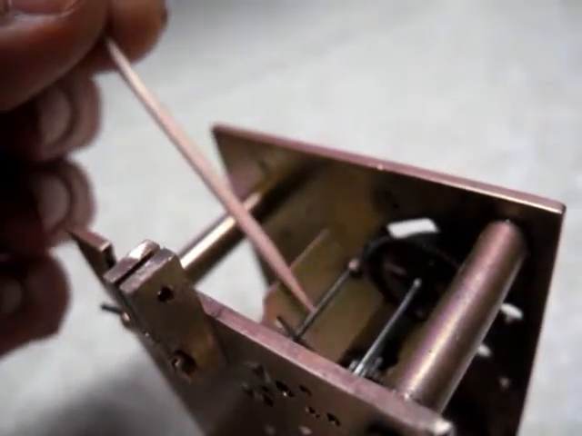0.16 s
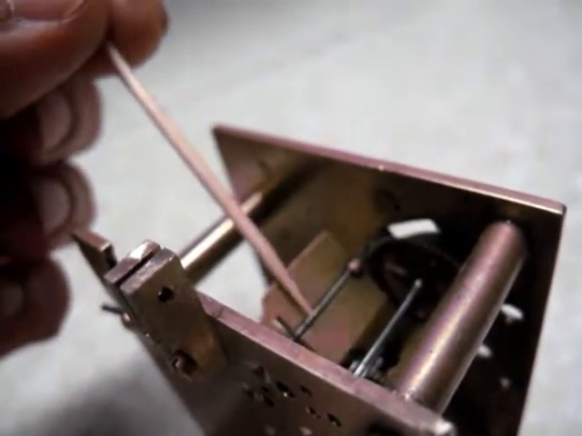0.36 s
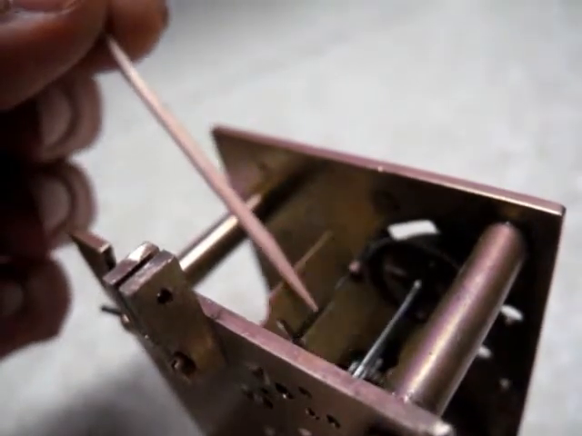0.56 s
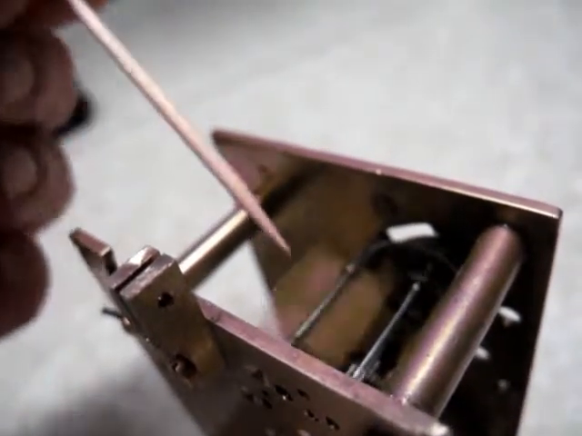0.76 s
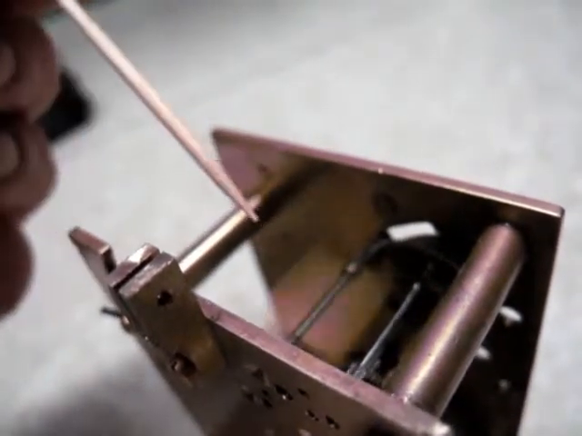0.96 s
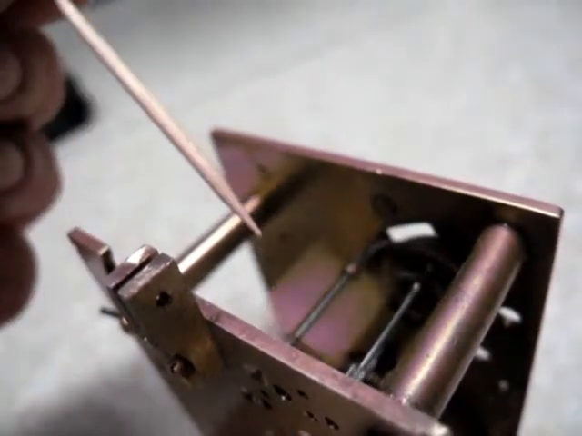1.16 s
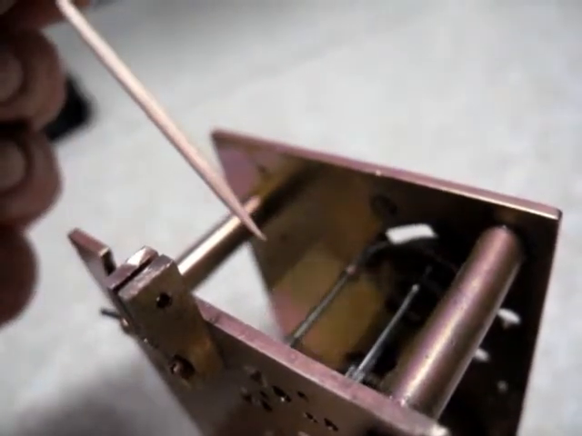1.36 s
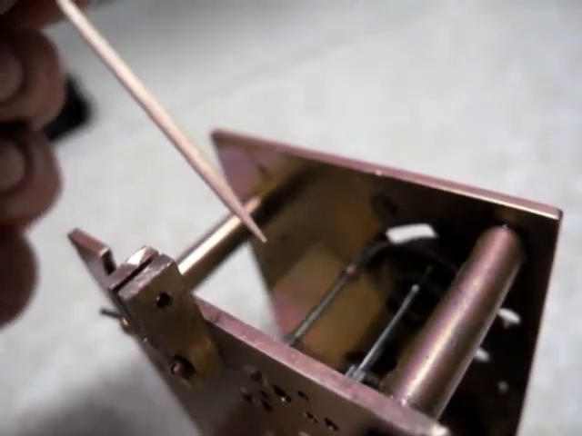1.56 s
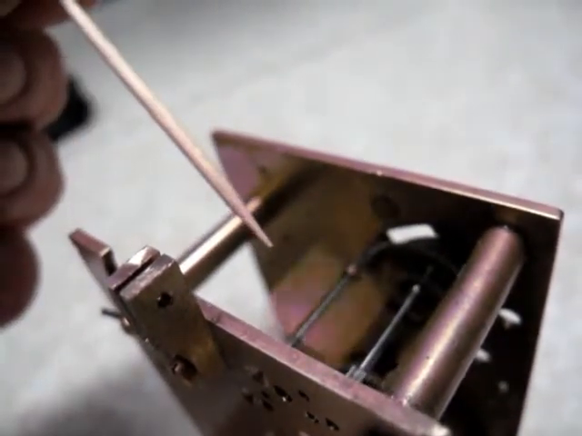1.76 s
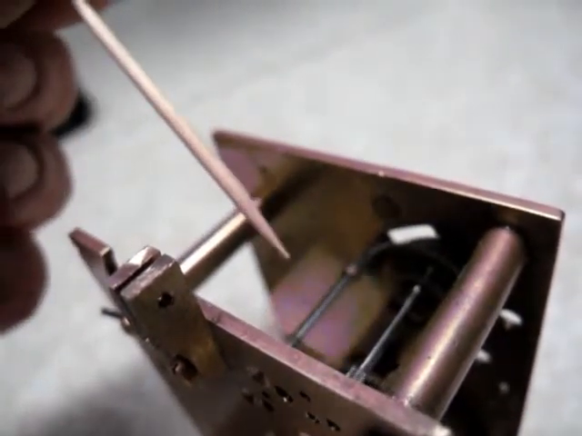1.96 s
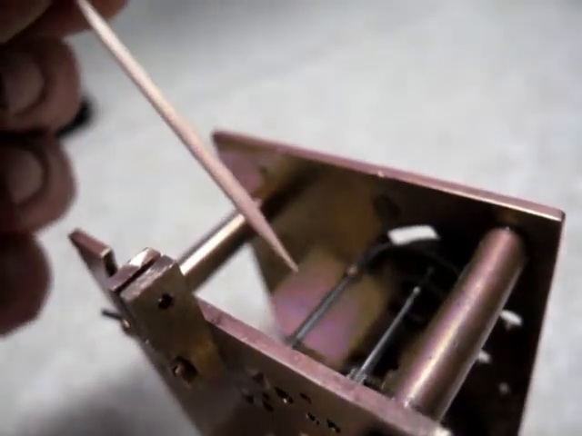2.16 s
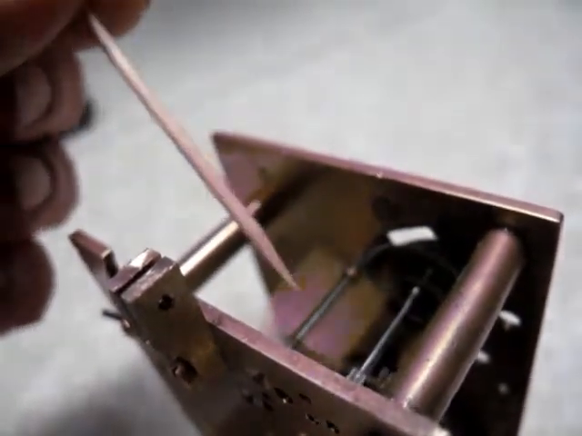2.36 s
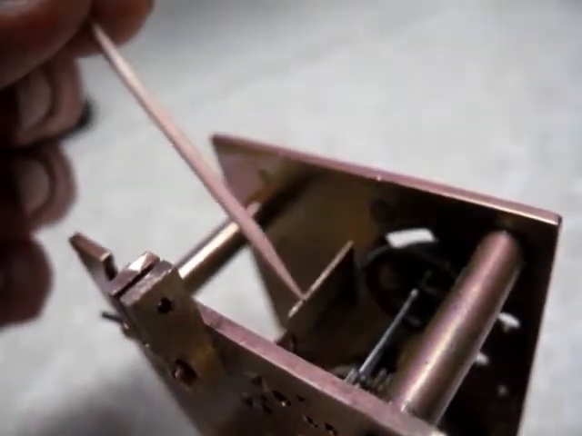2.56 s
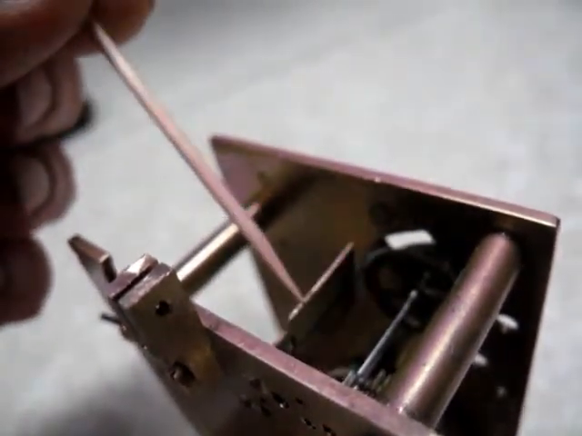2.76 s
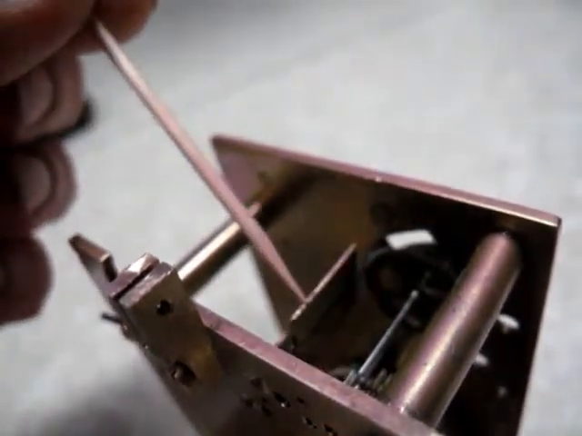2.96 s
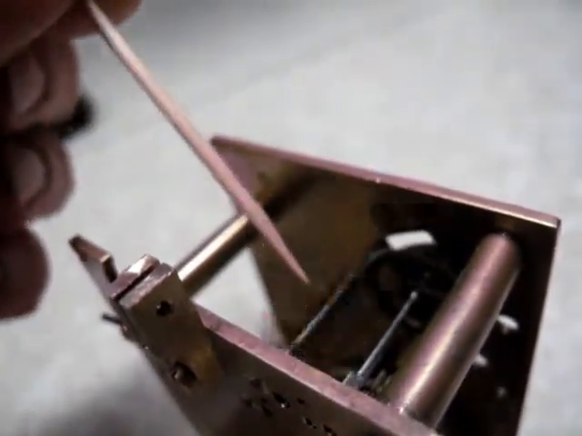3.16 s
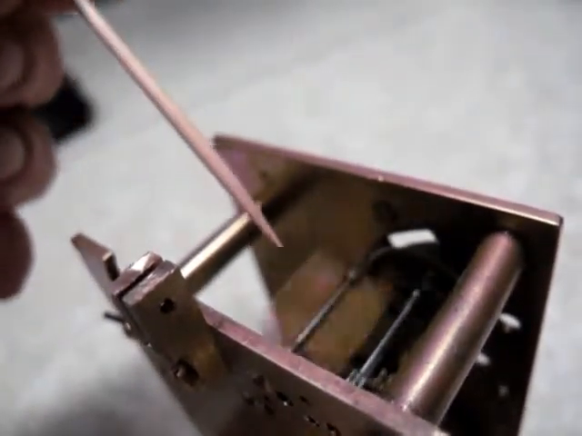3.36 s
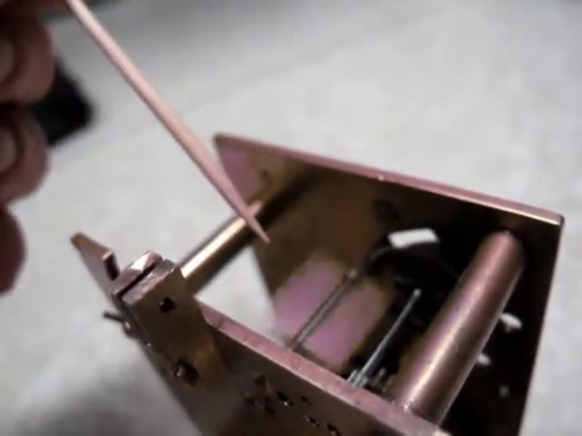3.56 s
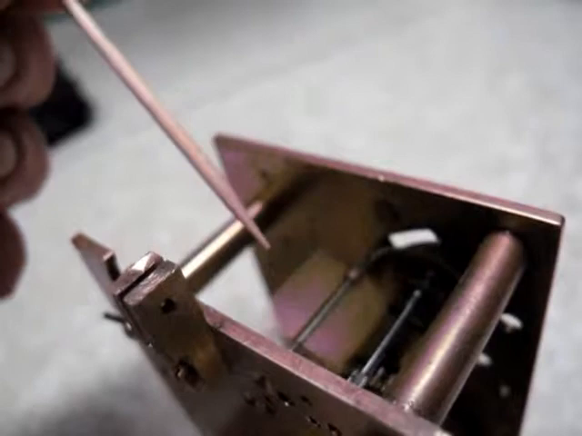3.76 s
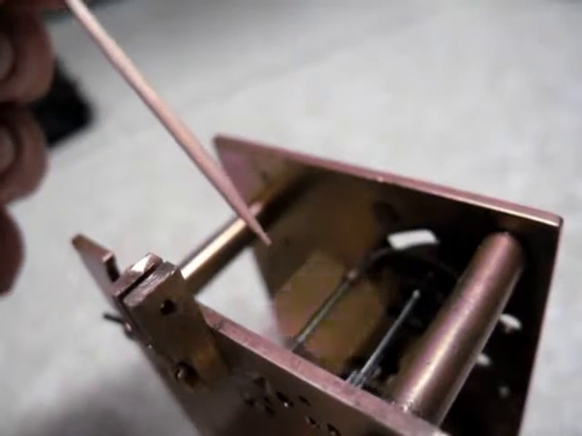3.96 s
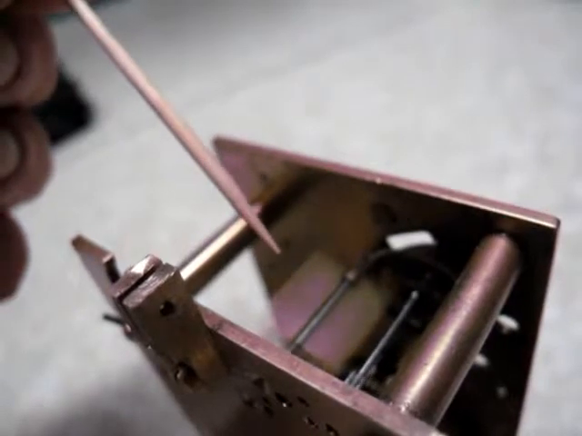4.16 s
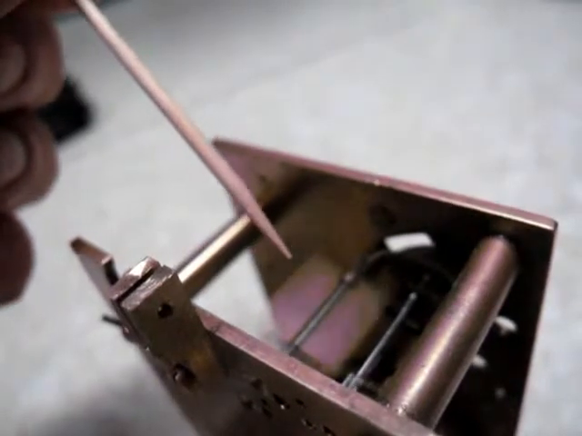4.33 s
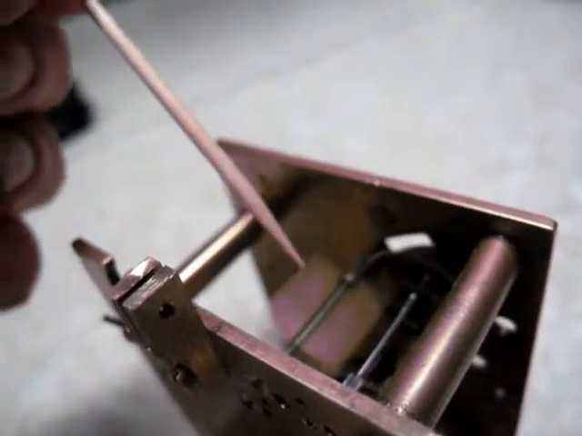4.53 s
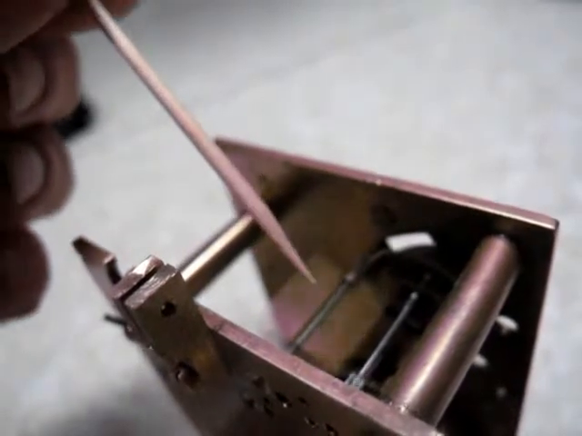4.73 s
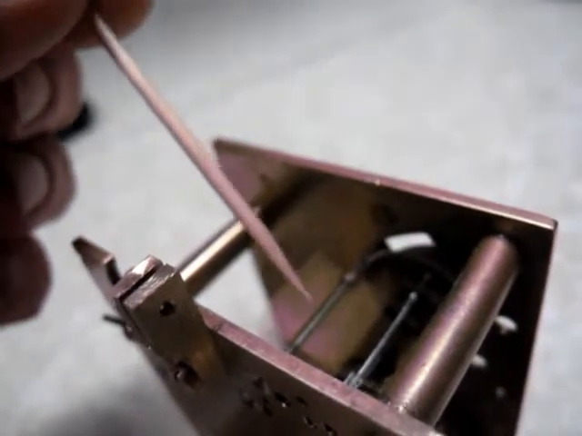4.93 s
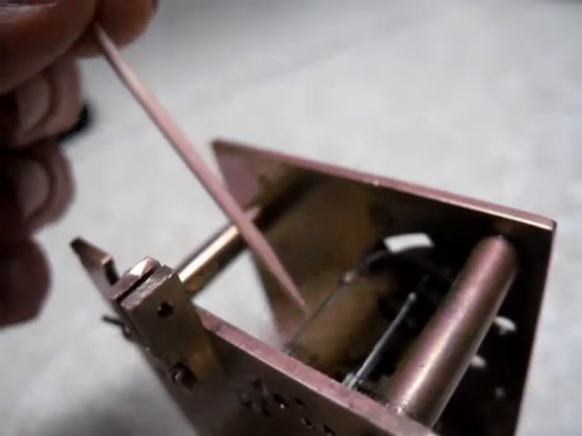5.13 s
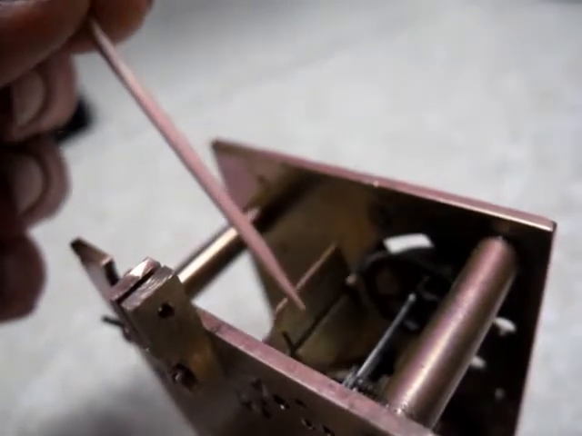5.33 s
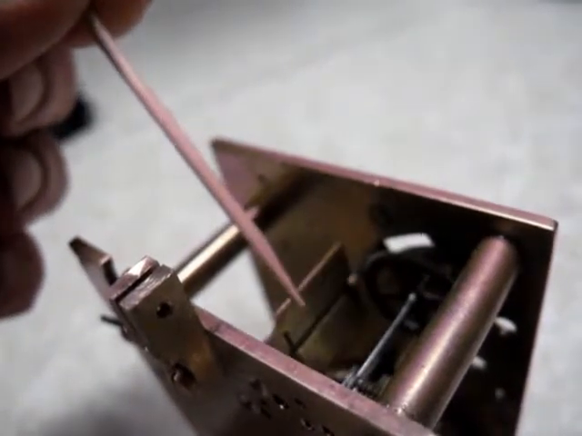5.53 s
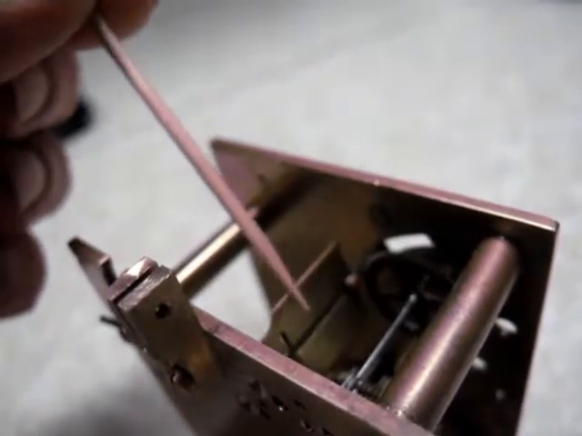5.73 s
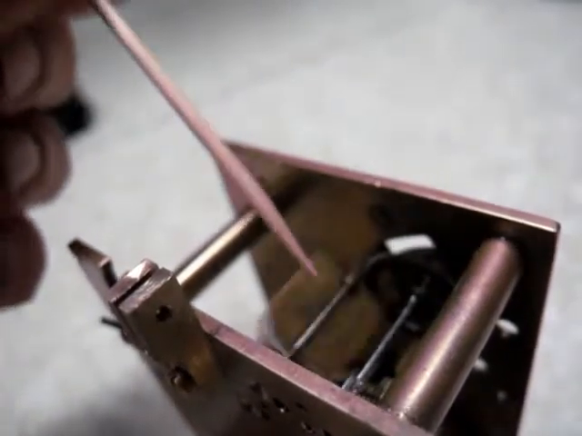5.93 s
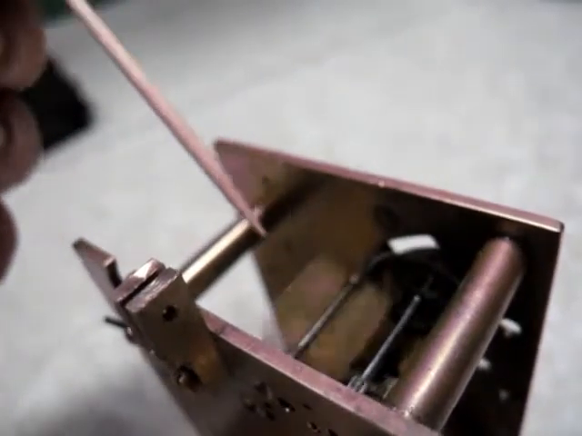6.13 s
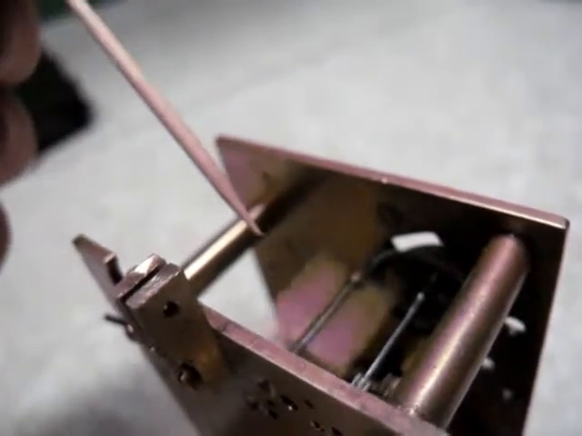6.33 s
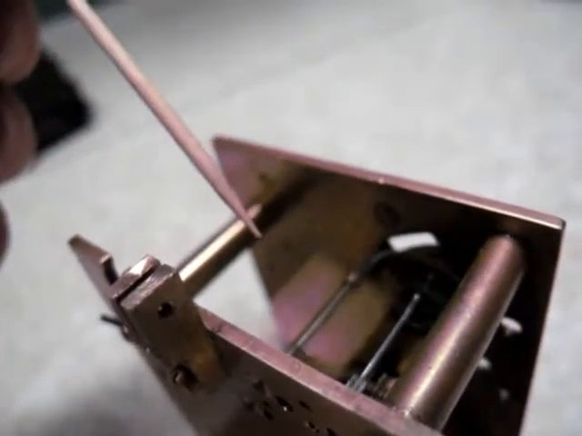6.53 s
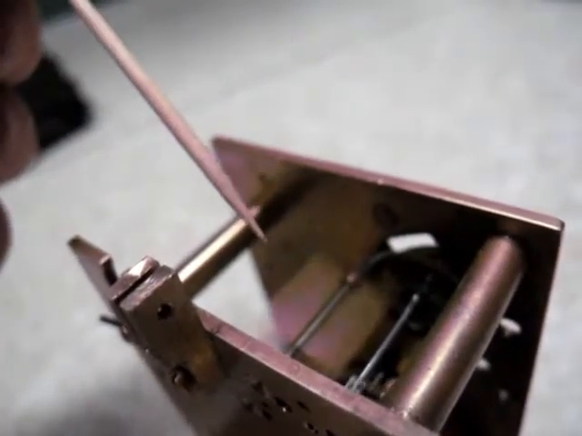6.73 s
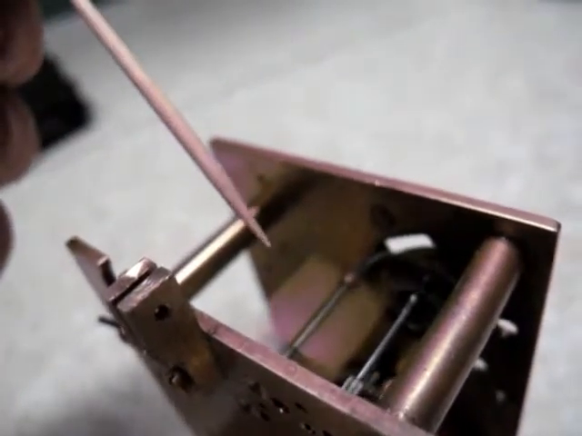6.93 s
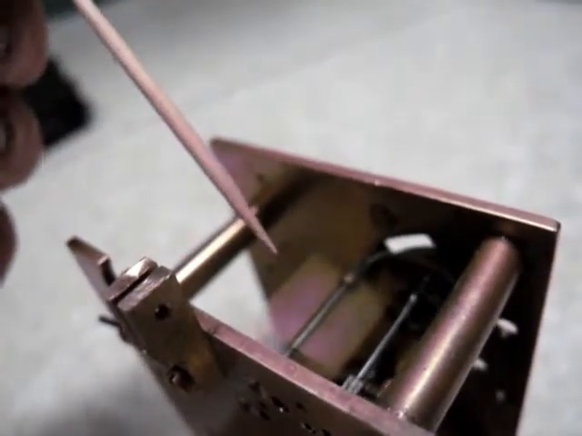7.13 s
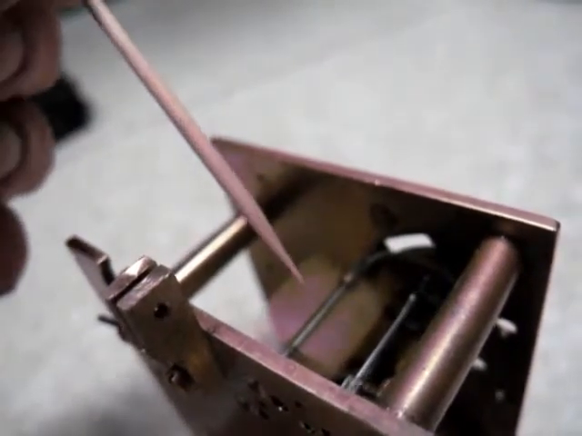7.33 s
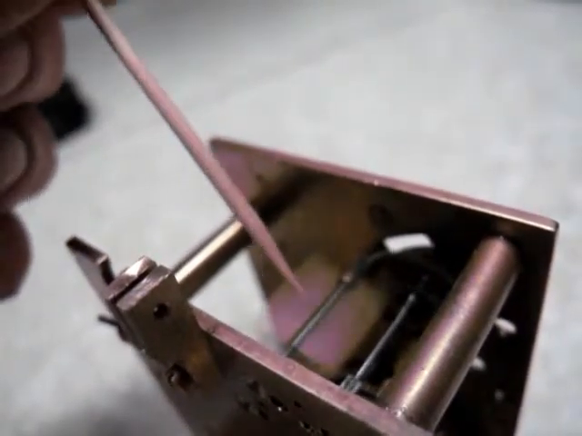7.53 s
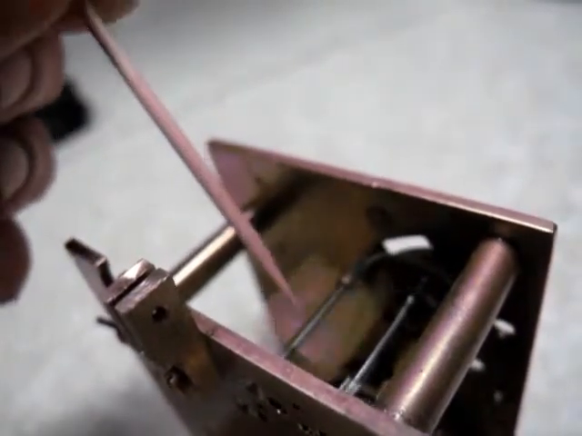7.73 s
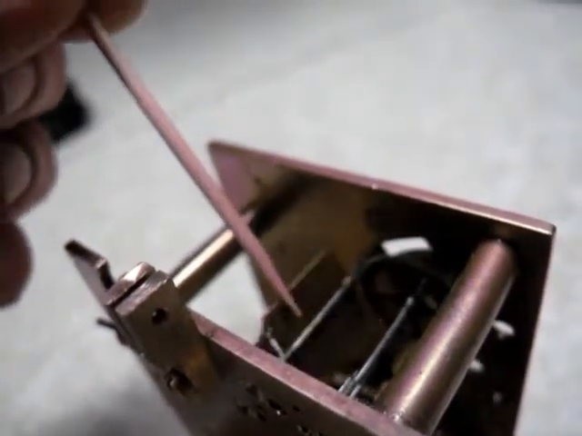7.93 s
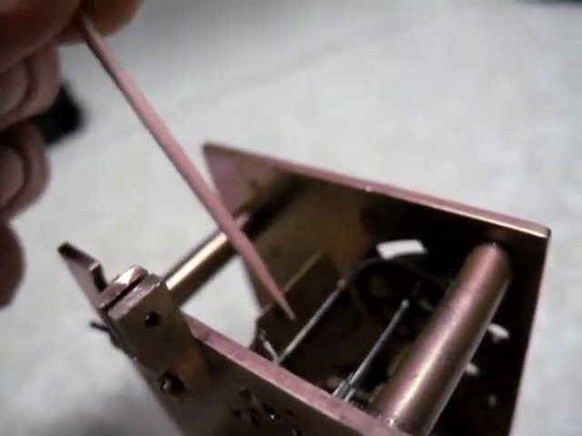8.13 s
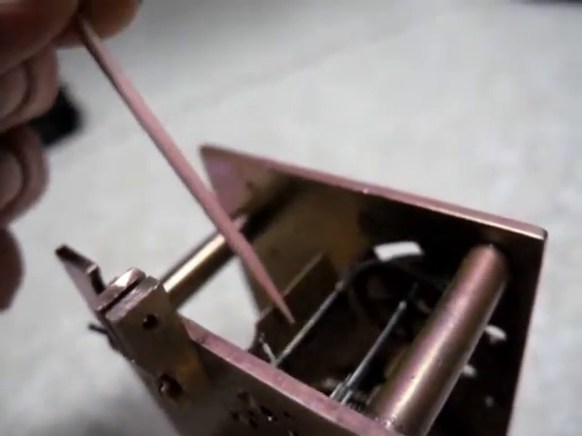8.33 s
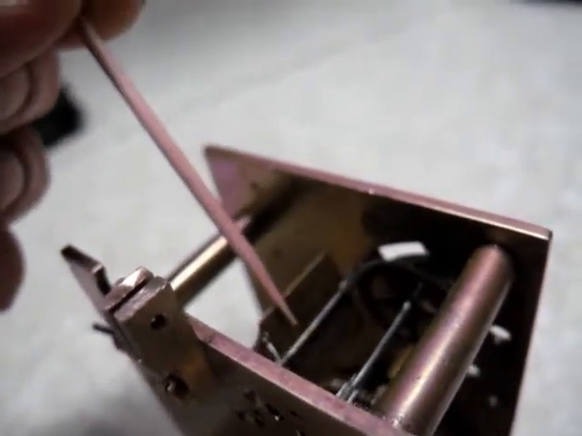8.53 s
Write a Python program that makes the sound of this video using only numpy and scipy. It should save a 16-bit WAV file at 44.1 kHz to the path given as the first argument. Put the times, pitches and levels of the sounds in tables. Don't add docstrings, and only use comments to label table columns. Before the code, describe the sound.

Very close to a small recorder, a spring-driven brass gear train is released three times. Each run starts with faint separate tooth ticks, accelerates into a bright, buzzing metallic whir with hard irregular knocks, then a wooden stick catches the spinning vane in a rapid, slowing flurry of sharp snaps and the sound cuts off. Quiet gaps between hold low room rumble, distant traffic, faint machine hum, hiss and a thin high whine.

```python
import sys
import numpy as np
from scipy import signal
from scipy.fft import rfft, irfft
from scipy.io import wavfile
from scipy.ndimage import uniform_filter1d

SR = 44100
rng = np.random.default_rng(int(sys.argv[2]) if len(sys.argv) > 2 else 0)


def ratio(d):
    e = np.asarray(d, float) / 20
    return 10 ** e


def file_out(sig):
    cols = np.atleast_2d(sig).T
    lim = np.clip(cols, -1, 1)
    pcm = np.round(lim * 32767).astype(np.int16)
    wavfile.write(sys.argv[1], SR, pcm)


N = 383229

# freq_hz, density_db_per_hz
ROOM_SPECTRUM = [(18, -34), (30, 2.5), (91, -17.5), (113, -6), (191, -3.5), (303, -4.5), (345, -11.5),
                 (402, -10), (649, -13.5), (843, -14), (920, -18), (1730, -21.5), (5500, -32), (7150, -47),
                 (12100, -120)]
# time_s, swell_db
TRAFFIC_SWELL = [
    (0, 6.5),
    (1, 9),
    (2.6, 1),
    (3.3, -7),
    (3.7, 9),
    (4.4, 4),
    (5.4, -5),
    (6.1, 6),
    (8, 9),
    (8.69, 11),
]
# time_s, pitch_hz, level_db
FAR_MOTOR = [
    [(0.22, 94, -63), (0.416, 94, -81), (0.618, 113, -75), (0.78, 103.7, -72)],
    [(1.1, 90, -73), (1.172, 95.6, -71), (1.53, 97.4, -67), (1.808, 97.7, -62), (2.17, 109.8, -62),
     (2.4, 110, -68)],
]
# time_s, pitch_hz, level_db
FAR_WHINE = [
    (0.22, 341, -74),
    (0.324, 361.5, -64),
    (0.574, 377, -64.5),
    (0.78, 377, -69),
]
# pitch_hz, level_db
HUM = [(48.4, -71.5), (91.5, -71), (140.0, -73.5), (199.2, -69.5), (231.5, -81.5), (371.4, -75),
       (899.0, -76)]
ROOM_DB, TRAFFIC_MIDDLE_SHARE = -58, 0.17

# release_s, top_turns_per_s, rise_s
RELEASES = [
    (.68, 60, .85),
    (3.17, 79, 1.56),
    (5.91, 69, 1.52),
]
# stop_s, rattle_at_reference_speed_db
STOPS = [
    (0.002, -31),
    (2.526, -34.5),
    (5.172, -34.5),
    (7.872, -34),
]
TAKE_UP = [
    0,
    .74,
    3.23,
    6.07,
]
# time_s, peak_db, plate_share_db
FIRST_TEETH = [(0.7731, -47, -1), (0.7894, -55, -9), (0.843, -49, -7), (0.8664, -54, -13),
               (3.2394, -45, -9), (3.3059, -50, -1), (3.3243, -45, -6), (6.0774, -52, -17),
               (6.125, -55, -9), (0.8167, -46, -4), (0.83, -41, -9), (0.885, -52, -12), (0.9447, -45, -5),
               (3.4079, -44, -17), (3.452, -42, -19), (6.2104, -45, -12), (6.282, -41, -8),
               (6.3575, -39, -18), (6.4209, -48, -19), (6.4443, -45, -19), (6.484, -50, -5)]
# time_s, peak_db, plate_share_db
KNOCKS_1 = [(0.9204, -55, -15), (0.9951, -32, -10), (1.0853, -30, -6), (1.116, -27, -7),
            (1.2188, -25.5, -5.5), (1.319, -24, -8), (1.345, -25, -15), (1.407, -17, -20),
            (1.487, -19.5, -12.5), (1.564, -19, -27), (1.5884, -19.5, -10.5), (1.6939, -19.5, -10),
            (1.7323, -19, -13), (1.757, -19.5, -9.5), (1.9647, -23, -14), (2.0773, -19, -31),
            (2.1149, -23, -7.5), (2.2896, -18, -24), (2.326, -19, -25), (2.401, -17, -29)]
# time_s, peak_db, plate_share_db
KNOCKS_2 = [(3.4822, -43, -7), (3.573, -45, 3), (3.623, -37, -5), (3.667, -37, 1), (3.821, -25, -9),
            (3.8812, -23.5, -8), (3.9913, -25, -4.5), (4.0928, -22, -18), (4.1392, -21, -19),
            (4.2253, -32, -18), (4.2584, -16, -6.5), (4.2873, -20.5, -4), (4.3354, -19.5, -9),
            (4.3673, -18.5, -11), (4.4637, -29, -8), (4.4949, -21, -9), (4.6416, -17, -19),
            (4.6924, -22, -32), (4.7578, -21, -19), (4.862, -22, -3.5), (4.9097, -23, -8),
            (4.9307, -23, -5), (5.034, -15.5, -5.5)]
# time_s, peak_db, plate_share_db
KNOCKS_3 = [(6.258, -47, -18), (6.3066, -35, -18), (6.57, -33, -10), (6.6125, -27, -22),
            (6.6934, -21.5, -18), (6.7696, -27.5, -2.5), (6.913, -23.5, -13), (6.9623, -30, -21),
            (7.011, -35, -21), (7.1116, -24.5, -4.5), (7.1467, -21, -30), (7.254, -25, -3.5),
            (7.2923, -26, -5), (7.3687, -21.5, -7), (7.403, -16.5, -34), (7.5782, -19, -23),
            (7.6172, -14, -10.5), (7.6508, -19, -6), (7.669, -17.5, -4), (7.7005, -19, -28)]
# freq_hz, width_hz, level_db
ARBOR = [(8395, 115, 2), (9010, 230, -10), (9945, 45, -14), (10500, 220, -11), (7640, 300, -22)]
# freq_hz, width_hz, level_db
PLATE = [(3010, 15, -22), (3269, 163, 2.5), (3710, 110, -0.5), (3920, 300, -3), (4293, 170, -11),
         (5020, 184, -3.5), (5270, 140, -10), (5860, 520, -9), (2417, 150, -18.5)]
# freq_hz, width_hz, level_db
BENCH = [(379, 93, 11), (567, 150, 5), (900, 67, -13.5), (1257, 40, -21)]
# freq_hz, width_hz, level_db
PIVOT = [(12850, 180, -1), (12900, 2400, -1), (14300, 500, -4), (15400, 500, -1)]
# freq_hz, level_db
CRACK = [(300, -12), (500, -6), (1000, -0.5), (2000, -0.5), (4000, 2), (6500, -0.5), (9500, 8),
         (11500, 4.5), (13000, -16), (18000, -16.5)]
PINION_LEAVES, REFERENCE_TURNS_PER_S, TAKE_UP_S = 8, 60, .03
RATTLE_DB_PER_DECADE, QUIET_BELOW_TURNS_PER_S = 20, 9.2
PLATE_SHARE_DB, BRAKE_PLATE_LOSS_DB = -4, 1.5
STOP_DROP_DB, STOP_DROP_S, STOP_FALL_DB_PER_S = 11, 0.0044, 234
KNOCK_TURNS, KNOCK_JITTER_S = 2.0, .006
KNOCK_DB, KNOCK_SPREAD_DB, KNOCK_PLATE_DB, KNOCK_PLATE_SPREAD_DB = 7, 5, -12, 10

# time_s, peak_db
BRAKE_1 = [
    (2.46, -17.5),
    (2.4684, -19),
    (2.477, -14),
    (2.487, -16),
    (2.4963, -10.5),
    (2.5087, -15),
    (2.5233, -14.5),
]
# time_s, peak_db
BRAKE_2 = [(5.0484, -15), (5.0645, -15.5), (5.0738, -18), (5.0805, -17), (5.0903, -15), (5.0987, -19),
           (5.1093, -15), (5.1174, -14), (5.1296, -18), (5.1403, -14.5), (5.1547, -16.5), (5.1686, -15),
           (5.191, -17.5)]
# time_s, peak_db
BRAKE_3 = [(7.7354, -14.5), (7.752, -13.5), (7.7614, -12.5), (7.7698, -13), (7.78, -17), (7.7893, -11),
           (7.8008, -14), (7.8112, -13.5), (7.8246, -17), (7.8365, -14), (7.8524, -16), (7.869, -15.5),
           (7.8981, -20.5)]
# time_s, peak_db, low_share_db
TOUCHES = [(0.0043, -22.5, -33), (0.0333, -23.5, -28), (0.1053, -39, -10), (0.118, -35, -15),
           (0.1521, -50, -4), (2.7946, -51, -8), (5.1954, -36, -4), (5.2626, -28.5, -12),
           (5.33, -36.5, -13.5), (8.0035, -30, -15), (8.0643, -48, -6), (8.497, -52, 6), (8.5386, -44, 6)]
# freq_hz, width_hz, level_db
VANE = [(1050, 970, -14), (1620, 2400, -23), (2030, 870, -9), (4300, 190, 4), (4610, 710, -0.5),
        (5650, 670, 0.5), (7340, 210, -8), (9060, 100, 9), (10740, 2300, 1), (14400, 3300, -9)]
# freq_hz, width_hz, level_db
SNAP = [(9250, 1360, 6), (4570, 2900, -0.5), (14000, 4300, 3.5), (1280, 1160, -5)]
HARD_BLOW_DB, HARD_BLOW_LOW_DB, SOFT_LOW_DB_PER_DB = -11, -9, 0.85

# loudest_s, hiss_db, plate_share_db
SLIDES = [
    (0.508, -58, -5.5),
    (5.498, -64, 1),
    (8.508, -60, 0.5),
]
SLIDE_RISE_DB_PER_S, SLIDE_FALL_DB_PER_S = 330, 270
# time_s, length_s, pitch_hz, level_db
SQUEAKS = [
    (0.53, 0.037, 3150, -66),
    (8.487, .008, 4400, -66),
    (8.564, 0.013, 4330, -61),
]

# freq_hz, level_db
HISS = [(1000, -6), (10500, -1.5), (12500, 4.5), (20000, 2)]
# freq_hz, gain_db
MICROPHONE = [(30, 0), (10200, 1), (11000, -2.5), (11500, -9), (12100, -10), (12700, -11), (14000, -11),
              (20000, -12)]
HISS_DB, WHINE_DB, WHINE_HZ, TOP_CUT_HZ = -66.5, -61.5, 5880, 15780


def rms_one(x):
    return x / np.sqrt(np.mean(x ** 2) + 1e-20)


def in_time(tables, column):
    t, out = np.arange(N) / SR, np.full(N, -120.)
    for rows in tables:
        rows = np.array(rows)
        inside = (t >= rows[0, 0]) & (t <= rows[-1, 0])
        out[inside] = np.interp(t[inside], rows[:, 0], rows[:, column])
    return out


def colour(x, spectrum, size=4096):
    hz = np.maximum(np.arange(size // 2 + 1) * SR / size, 1)
    points = np.array(spectrum)
    gain_db = np.interp(np.log(hz), np.log(points[:, 0]), points[:, 1])
    cepstrum = irfft(np.log(ratio(gain_db)))
    cepstrum[1:size // 2] *= 2
    cepstrum[size // 2 + 1:] = 0
    response = irfft(np.exp(rfft(cepstrum)))
    return signal.fftconvolve(x, response)[:N]


def resonance(x, hz, width_hz):
    r = np.exp(-np.pi * width_hz / SR)
    zeros = np.array([1, 0, -1]) * (1 - r * r) / 2
    poles = [1, -2 * r * np.cos(2 * np.pi * hz / SR), r * r]
    return signal.lfilter(zeros, poles, x + 1e-18)


def mode_rings(x, modes):
    return [(-1) ** k * ratio(db) * resonance(x, hz, width_hz) for k, (hz, width_hz, db) in enumerate(modes)]


def body(x, modes):
    return sum(mode_rings(x, modes))


def drift(rate_hz):
    r = np.exp(-2 * np.pi * rate_hz / SR)
    return rms_one(signal.lfilter([1], [1, -2 * r, r * r], rng.standard_normal(N + SR))[SR:])


def contacts(per_s, spread_db, lump_db, teeth=0):
    size_db = spread_db * np.minimum(rng.exponential(1, N), 2.5)
    sizes = ratio(size_db) * rng.choice([-1, 1], N)
    hits = (rng.random(N) < per_s / SR) + teeth
    return rms_one(sizes * hits * ratio(lump_db * drift(80)))


def bursts(times_s, levels_db, length_s, rise_s=.00002):
    out, size = np.zeros(N + 400), 300
    decay = np.exp(-np.arange(size) / (length_s * SR))
    rise = 1 - np.exp(-(np.arange(size) + 1) / (rise_s * SR))
    shapes = rng.choice([-1, 1], (len(times_s), size)) * decay * rise
    for s, db, shape in zip(times_s, levels_db, shapes):
        at = round(s * SR)
        out[at:at + size] += ratio(db) * shape
    return out[:N]


def far_line(tables):
    phase = 2 * np.pi * np.cumsum(np.maximum(in_time(tables, 1), 0)) / SR
    level = uniform_filter1d(ratio(in_time(tables, 2)), size=2000)
    return np.sqrt(2) * level * np.sin(phase)


def background():
    t, swell_db = np.arange(N) / SR, in_time([TRAFFIC_SWELL], 1)
    rumble = ratio(ROOM_DB - 1.0) * rms_one(colour(rng.standard_normal(N), ROOM_SPECTRUM, size=16384))
    middle = rms_one(resonance(rng.standard_normal(N), 680, 1600))
    middle = ratio(-64.5 + TRAFFIC_MIDDLE_SHARE * swell_db) * middle
    bass = rms_one(resonance(resonance(rng.standard_normal(N), 77, 70), 77, 70))
    bass = ratio(-73.5 + swell_db) * bass
    hum = 0
    for hz, db in HUM:
        level = ratio(db + 3 + 1.2 * drift(1.5))
        hum = hum + level * np.sin(2 * np.pi * hz * t + .8 * drift(1.2))
    return rumble + middle + bass + hum + far_line(FAR_MOTOR) + far_line([FAR_WHINE])


def fly_speed():
    t, out = np.arange(N) / SR, np.full(N, float(REFERENCE_TURNS_PER_S))
    for start_s, top, rise_s in RELEASES:
        after = t >= start_s
        out[after] = top * np.tanh((t[after] - start_s) / rise_s)
    return out


def fly_turns():
    return np.cumsum(fly_speed()) / SR


def rattle_db():
    t, turns_per_s = np.arange(N) / SR, fly_speed()
    run = np.searchsorted(np.array(RELEASES)[:, 0], t, side="right")
    stop_s, level_db = np.array(STOPS)[run].T
    held_s = np.maximum(t - stop_s, 0)
    brake_s = np.array([0, BRAKE_1[0][0], BRAKE_2[0][0], BRAKE_3[0][0]])
    braked = t >= brake_s[run]
    bite = np.clip(1 + (t - np.array(TAKE_UP)[run]) / TAKE_UP_S, 0, 1)
    turns_per_s = turns_per_s * bite
    excess = turns_per_s ** 3 / (turns_per_s + QUIET_BELOW_TURNS_PER_S) ** 2
    arbor_db = level_db + RATTLE_DB_PER_DECADE * np.log10(excess / REFERENCE_TURNS_PER_S + 1e-4)
    arbor_db = arbor_db - STOP_DROP_DB * (1 - np.exp(-held_s / STOP_DROP_S)) - STOP_FALL_DB_PER_S * held_s
    plate_db = arbor_db + PLATE_SHARE_DB - BRAKE_PLATE_LOSS_DB * braked
    return arbor_db, plate_db, braked


def worn_tooth_knocks(turn, arbor_db):
    hard = np.array(FIRST_TEETH + KNOCKS_1 + KNOCKS_2 + KNOCKS_3)
    at = np.flatnonzero(np.diff(np.floor(turn / KNOCK_TURNS)))
    chance = np.clip(rng.standard_normal((400, 3)), -2, 1.5)[:len(at)]
    s = np.clip(at / SR + KNOCK_JITTER_S * chance[:, 0], 0, None)
    peak_db = arbor_db[at] + KNOCK_DB + KNOCK_SPREAD_DB * chance[:, 1]
    share_db = KNOCK_PLATE_DB + KNOCK_PLATE_SPREAD_DB * chance[:, 2]
    near_hard = np.abs(s[:, None] - hard[:, 0]).min(axis=1) < .015
    peak_db[near_hard] = -120
    steady = np.c_[s, peak_db, share_db]
    return np.r_[hard, steady[s < N / SR]].T


def train():
    arbor_db, plate_db, braked = rattle_db()
    turn = fly_turns()
    teeth = 2.22 * np.diff(np.floor(PINION_LEAVES * turn), prepend=0)
    beat = ratio(2.5 * np.cos(2 * np.pi * turn) + 3.0 * np.cos(4 * np.pi * turn + 1.2))
    shared = beat * contacts(2600, spread_db=3.5, lump_db=1.3, teeth=teeth)
    arbor_own = 1.24 * beat * contacts(1600, spread_db=3.0, lump_db=1.5)
    arbor = rms_one(body(shared + arbor_own, ARBOR))
    plate_own = 1.76 * beat * contacts(1400, spread_db=6.0, lump_db=2.5)
    plate = rms_one(body(shared + plate_own, PLATE))
    crackle = rms_one(colour(shared + 0.58 * rng.standard_normal(N), CRACK))
    bench = rms_one(body(shared + 3.0 * rng.standard_normal(N), BENCH))
    pivot = rms_one(body(0.47 * shared + rng.standard_normal(N), PIVOT))

    slow = np.exp(-np.gradient(turn) * SR / 14)
    drop = slow * rms_one(resonance(contacts(150, spread_db=4.5, lump_db=-2.5, teeth=teeth), 3350, 220))

    s, peak_db, share_db = worn_tooth_knocks(turn, arbor_db - 60 * braked)
    knock = body(bursts(s, peak_db + 7.5, 0.0046, rise_s=0.00014), ARBOR)
    knock = knock + body(bursts(s, peak_db + share_db + 20, 0.0017, rise_s=0.0012), PLATE)
    knock = knock + colour(bursts(s, peak_db - 15, 0.00082), CRACK)

    rattle = ratio(arbor_db - 4.0) * arbor + ratio(plate_db - 1.5) * plate
    rattle = rattle + ratio(arbor_db - 5.5) * crackle + ratio(arbor_db - 8.5) * pivot
    return rattle + ratio(plate_db - 22.5) * bench + ratio(plate_db + 11) * drop + knock


def snaps():
    brake = [(s, db, HARD_BLOW_LOW_DB + SOFT_LOW_DB_PER_DB * (HARD_BLOW_DB - db))
             for s, db in BRAKE_1 + BRAKE_2 + BRAKE_3]
    s, peak_db, low_db = np.transpose(brake + TOUCHES)
    click = np.arange(400) == 0
    rings = np.array(mode_rings(click, VANE))
    low = np.array(VANE)[:, 0] < 3000
    strength_db = 1.67 * rng.standard_normal((len(s), len(VANE))) + np.outer(low_db + 18, low)
    blows = ratio(strength_db) @ rings + body(click, SNAP)
    blows = blows + ratio(-11) * np.roll(blows, 35, axis=1)
    vane = np.zeros(N + 400)
    for at, db, blow in zip(np.round(s * SR).astype(int), peak_db, blows):
        vane[at:at + 400] += ratio(db + 6) * blow / np.abs(blow).max()

    shaken = bursts(s, peak_db, .0012)
    frame = ratio(-1.0) * body(shaken, ARBOR) + ratio(-1.5) * body(shaken, PLATE)
    frame = frame + ratio(-9.5) * colour(shaken, CRACK)
    frame = frame + colour(bursts(s, peak_db - 20, 0.000065), CRACK)
    frame = frame + ratio(-20) * body(shaken, PIVOT)
    return vane[:N] + frame


def room_tail(x, t60_s):
    tail = rng.standard_normal(SR // 2) * ratio(-60 * np.arange(SR // 2) / SR / t60_s)
    tail[:200] = 0
    tail = signal.lfilter([.6], [1, -.4], tail)
    return signal.fftconvolve(x, tail / np.linalg.norm(tail))[:N]


def slides():
    rub = rms_one(resonance(contacts(6000, spread_db=2.0, lump_db=-0.5), 8600, 2500))
    grit = contacts(300, spread_db=4.0, lump_db=3.0)
    plate = resonance(grit, 3100, 500) + 0.8 * resonance(grit, 4450, 300)
    plate = rms_one(plate + 0.47 * resonance(grit, 5400, 400))
    t, out = np.arange(N) / SR, 0
    for s, hiss_db, share_db in SLIDES:
        loss_db = np.maximum(SLIDE_RISE_DB_PER_S * (s - t), SLIDE_FALL_DB_PER_S * (t - s))
        out = out + ratio(hiss_db - loss_db) * rub
        out = out + ratio(hiss_db + share_db - 0.5 - loss_db) * plate
    return out


def squeaks():
    t, out = np.arange(N) / SR, 0
    for s, length_s, hz, db in SQUEAKS:
        swell = np.exp(-((t - s) / length_s) ** 2)
        out = out + ratio(db) * swell * rms_one(resonance(rng.standard_normal(N), hz, 300))
    return out


def scene():
    movement = train() + snaps() + slides() + squeaks()
    return (movement + ratio(-13.5) * room_tail(movement, t60_s=0.13) + background())[None]


def roll_off(x):
    return signal.sosfilt(signal.butter(12, 16810, fs=SR, output="sos"), x)


def record(dry):
    hiss = ratio(HISS_DB) * colour(rng.standard_normal(N), HISS)
    x = colour(dry[0] + hiss, MICROPHONE)
    for sharpness in (22, 35, 60):
        x = signal.lfilter(*signal.iirnotch(2 * WHINE_HZ, sharpness, fs=SR), x)
    x = x + np.sqrt(2) * ratio(WHINE_DB) * np.sin(2 * np.pi * WHINE_HZ * np.arange(N) / SR)
    x = signal.sosfilt(signal.ellip(12, .5, 55, TOP_CUT_HZ, fs=SR, output="sos"), x)
    return roll_off(x[None])


dry = scene()
out = record(dry)
file_out(out)
```